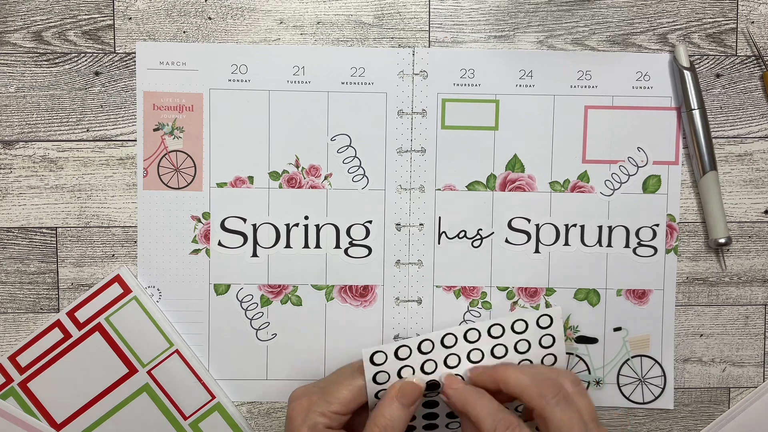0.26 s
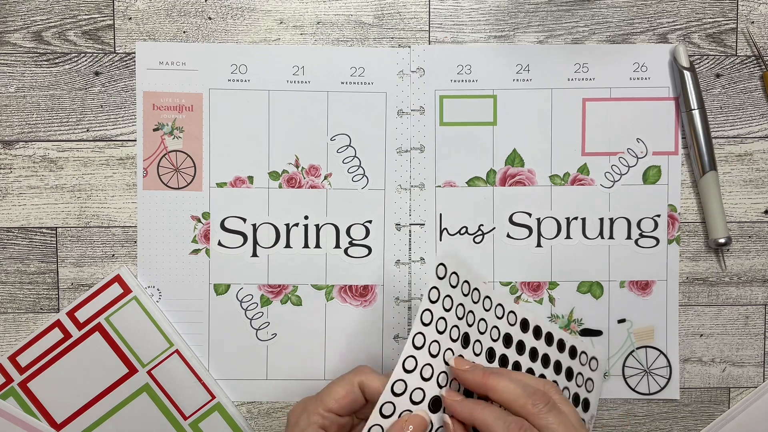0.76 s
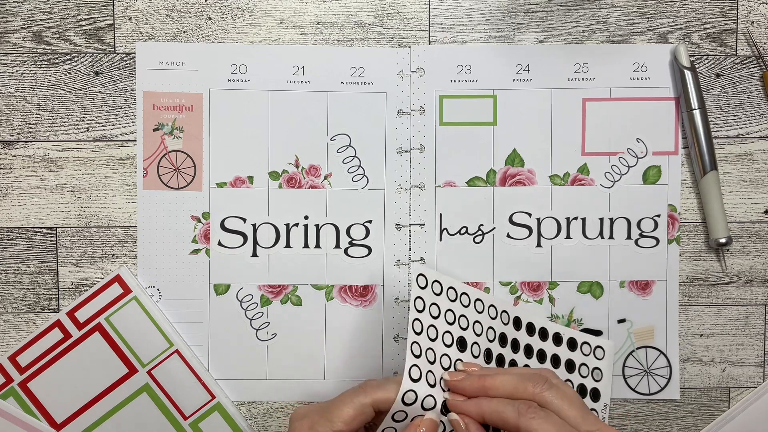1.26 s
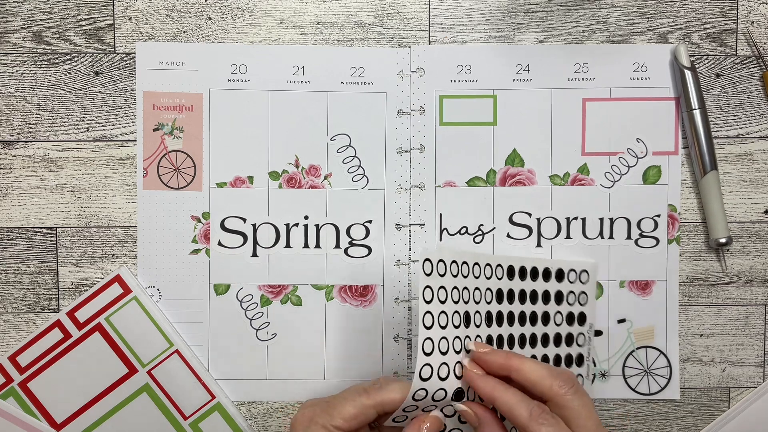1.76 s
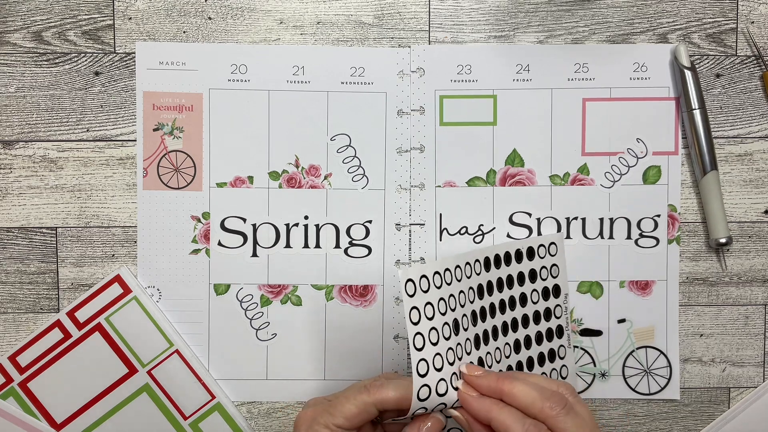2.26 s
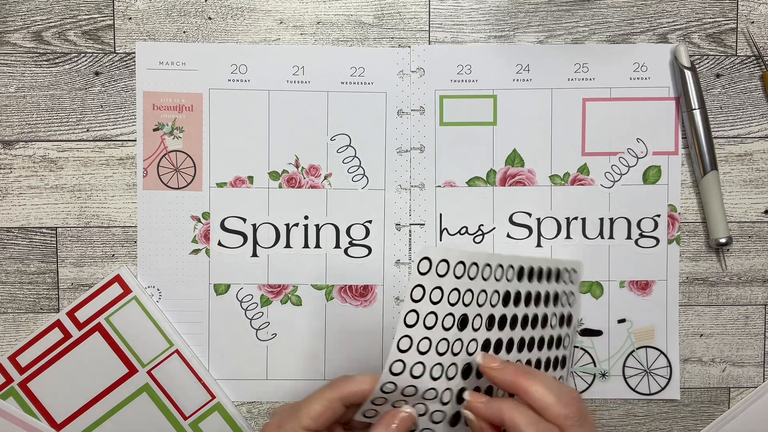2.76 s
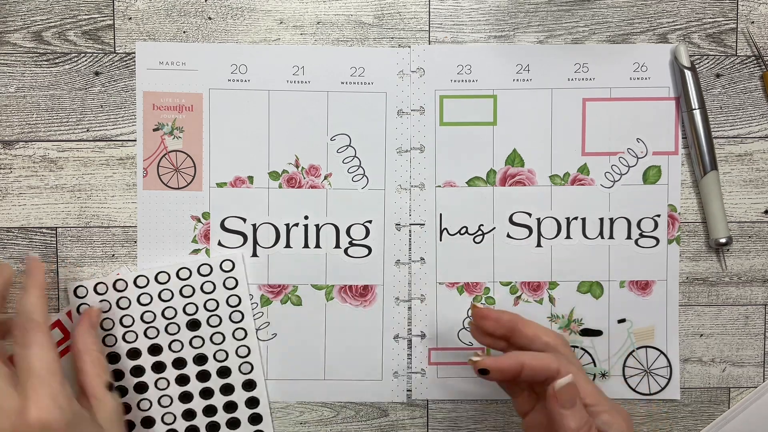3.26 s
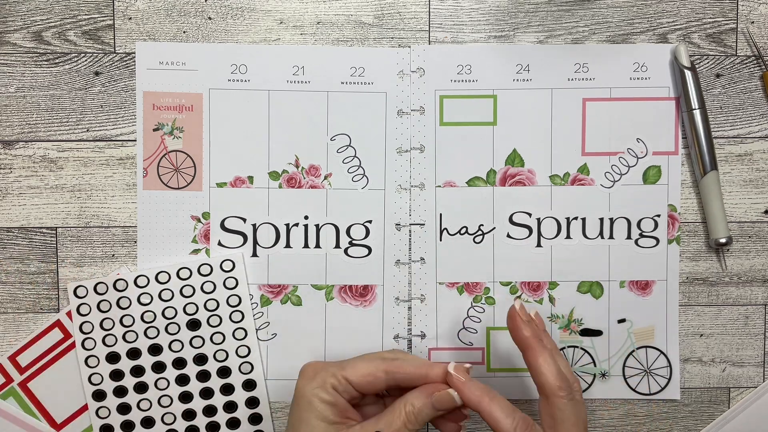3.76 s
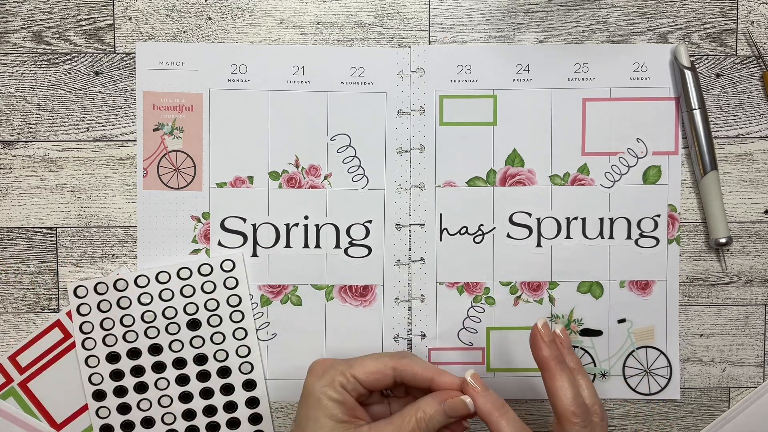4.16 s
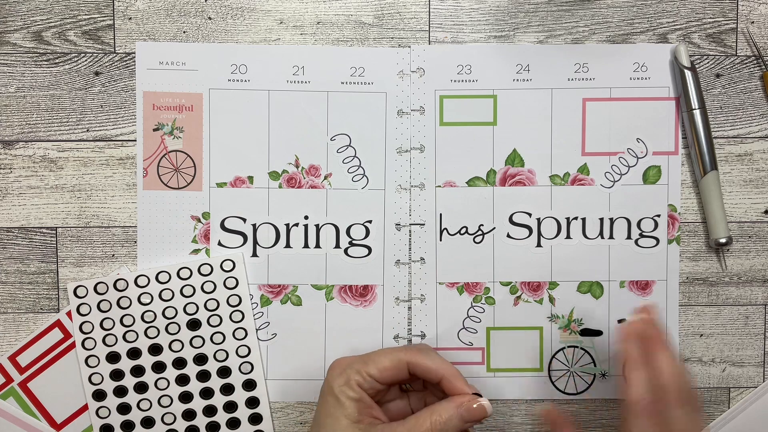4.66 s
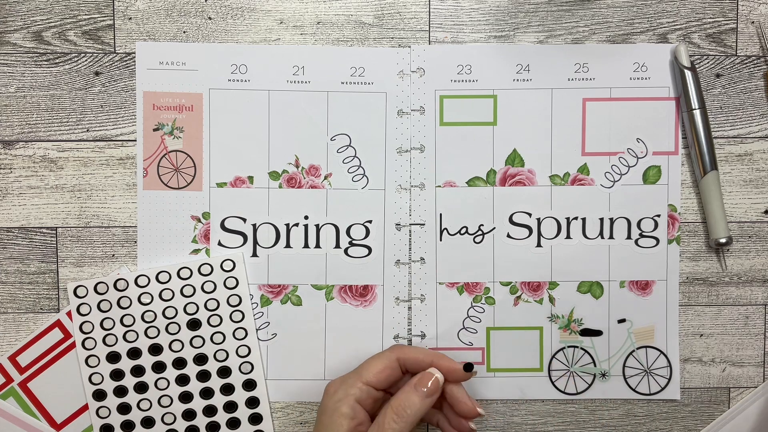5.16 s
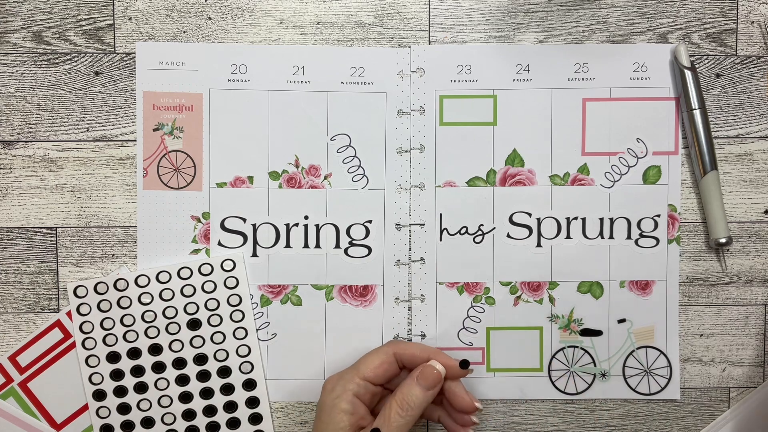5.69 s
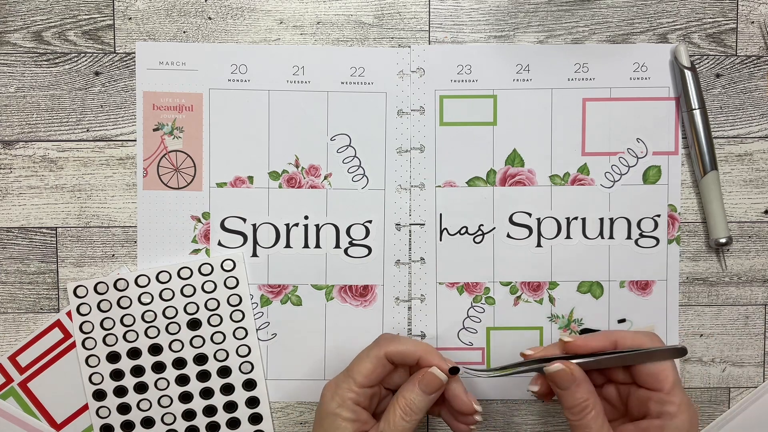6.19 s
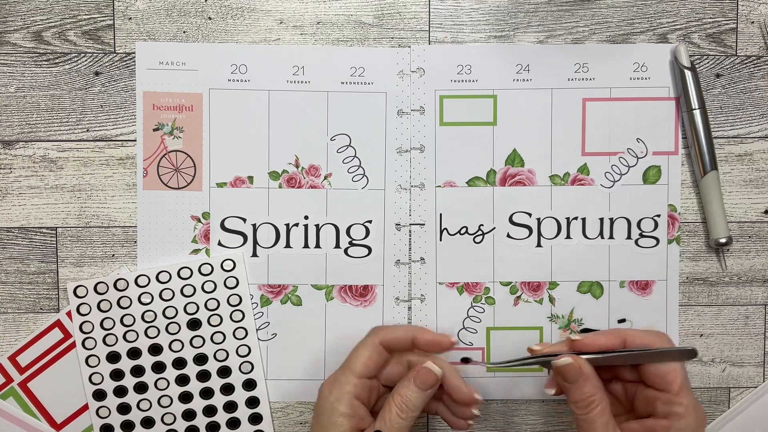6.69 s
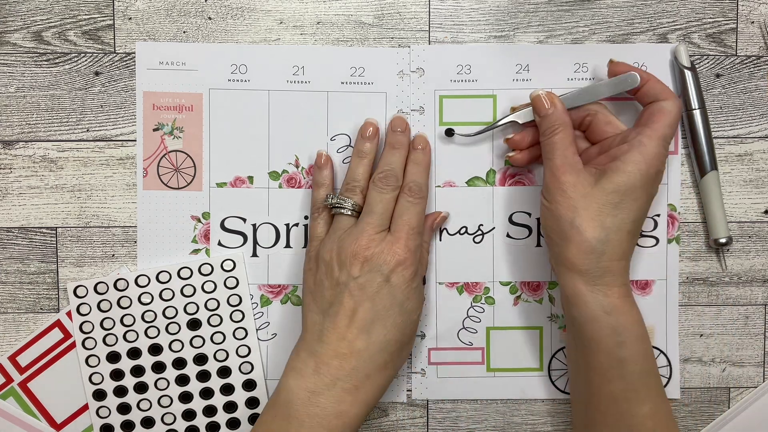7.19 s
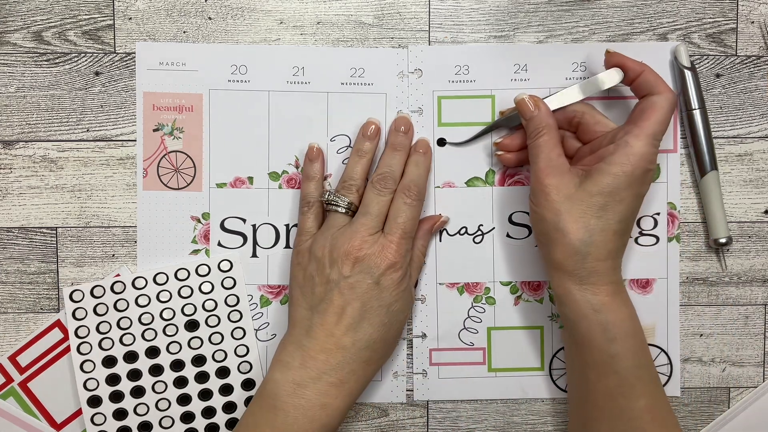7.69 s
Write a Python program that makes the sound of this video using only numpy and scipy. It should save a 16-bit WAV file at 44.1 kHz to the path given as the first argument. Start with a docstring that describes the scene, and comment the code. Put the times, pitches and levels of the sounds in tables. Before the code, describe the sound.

Small stiff sticker sheet rubbed, bent and flicked with papery crackles, then a tiny peel, desk knocks, a brief metallic tweezer scrape and soft page brushes.

```python
"""A small sticker sheet is rubbed, bent and flicked over a paper planner: friction grains excite its resonances,
with crinkles, pops and brief rasps, while low puffs of noise swell and fade.
A dot peels off in a run of jerks; tweezers scrape, stick and slip on the desk, and ring as they touch things.
Low thuds excite damped modes of the desk, and a palm brushes the page as filtered friction noise.
Two close microphone ports hear it by phase and level, with short room reflections and a low noise rumble."""
import sys
import numpy as np
from scipy import signal
from scipy.fft import rfft, irfft, next_fast_len
from scipy.io import wavfile
from scipy.ndimage import map_coordinates

SR = 44100
rng = np.random.default_rng(int(sys.argv[2]) if len(sys.argv) > 2 else 0)


def to_wav(sig):
    """Store sig (one row per channel, or 1-D mono) as 16-bit WAV at the path in sys.argv[1].

    Samples outside -1..1 are clipped; the rate is SR.
    """
    pcm = np.clip(np.atleast_2d(sig), -1, 1) * 32767
    pcm = np.round(pcm).astype(np.int16)
    wavfile.write(sys.argv[1], SR, pcm.T)  # frames by channels


N = 350135
TIME = np.arange(N) / SR


def from_db(db):
    """Logarithmic level: decibels become an amplitude gain."""
    return 10 ** (np.asarray(db) / 20)


def rms_one(x):
    """Mean power: scale a signal to unit rms."""
    return x / np.sqrt(np.mean(x ** 2) + 1e-20)


def per_bin(points, size):
    """Log-frequency interpolation: read a table at every FFT bin."""
    hz, value = np.transpose(points)
    bins_hz = np.fft.rfftfreq(size, 1 / SR)
    return np.interp(np.log(bins_hz + 1), np.log(hz), value)


def colour(x, spectrum):
    """Minimum-phase filtering: a causal response with the given spectrum, falling away beyond its ends."""
    size = 2 * next_fast_len(x.shape[-1] // 2 + 2048)
    low_end = (spectrum[0][0] / 4, spectrum[0][1] - 30)
    high_end = (spectrum[-1][0] * 4, spectrum[-1][1] - 40)
    gain = from_db(per_bin([low_end, *spectrum, high_end], size))
    # folding the cepstrum onto positive time gives the minimum phase
    cepstrum = irfft(np.log(gain))
    cepstrum[1:size // 2] *= 2
    cepstrum[size // 2 + 1:] = 0
    response = np.exp(rfft(cepstrum))
    return irfft(rfft(x, size) * response)[..., :x.shape[-1]]


def resonate(x, hz, width):
    """Simple resonance: one peak whose bandwidth is a share of its centre."""
    hz = min(hz, 0.42 * SR)
    bandwidth_hz = min(hz * width, SR / 4)
    b, a = signal.iirpeak(hz, hz / bandwidth_hz, fs=SR)
    return signal.lfilter(b, a, x)


def drift(rate):
    """Slow random fluctuation: straight lines between normal random values, rate of them a second."""
    knots = rng.standard_normal(N // 20)
    return np.interp(TIME * rate, np.arange(len(knots)), knots)


def add(track, s, sound):
    """Superposition: mix a sound in at time s."""
    start = max(round(s * SR), 0)
    track[start:start + len(sound)] += sound[:N - start]


def grains(per_s, spread_db, patchy_db):
    """Friction as random impulses: surfaces catch and let go in clumps of tiny clicks of uneven size."""
    size_db = spread_db * np.minimum(rng.exponential(1, N), 4)
    sizes = from_db(size_db) * rng.choice([-1, 1], N)
    catches = rng.random(N) < per_s / SR
    return rms_one(sizes * catches * from_db(patchy_db * drift(110)))


def crack(decay_s, edge, rise_s=0.00032):
    """Impulsive release: a sudden edge, then a noise flutter that builds up and dies fast."""
    t = TIME[:SR // 10]
    decay = np.exp(-t / max(decay_s, 1e-4))
    burst = rng.standard_normal(len(t)) * decay * np.minimum(t / rise_s, 1)
    burst[0] += edge
    return burst


def at_level(hit, db):
    """Energy level: scale a hit so that its energy, spread over 4 ms, has this level."""
    return from_db(db) * hit / np.sqrt(np.sum(hit ** 2) / (0.004 * SR))


def click(db, hz, width, decay_s, edge, raw_db, skirt):
    """Impulse-excited resonance: a crack rings one peak and partly passes raw, dulled above the peak."""
    burst = crack(decay_s, edge)
    hit = rms_one(resonate(burst, hz, width)) + from_db(raw_db) * rms_one(burst)
    cutoff_hz = min(hz * (1 + width) * skirt, SR * 4 / 9)
    b, a = signal.butter(2, cutoff_hz, fs=SR)
    return at_level(signal.lfilter(b, a, hit), db)


def strokes(rows, attack_s, slope_db_per_s, release_db_per_s):
    """Power summation of envelopes: one gain curve per level column; strokes rise, slope and die away."""
    power = np.zeros((len(rows[0]) - 2, N))
    for start_s, length_s, *levels_db in rows:
        t = np.maximum(TIME - start_s, 0)
        slope_db = slope_db_per_s * np.minimum(t, length_s)
        release_db = release_db_per_s * np.maximum(t - length_s, 0)
        shape = np.minimum(t / attack_s, 1) * from_db(np.maximum(slope_db - release_db, -120))
        power += np.outer(from_db(levels_db), shape) ** 2
    return np.sqrt(power)


def flex(x, share, rate):
    """Varying stiffness: a wandering time scale moves a body's resonances up and down by about this share."""
    speed = np.exp(share * drift(rate))
    positions = np.cumsum(speed / speed.mean()) - 1
    return map_coordinates(x, [positions], order=3, mode="nearest")


def close_modes(x, t60, share):
    """Modal density: a thin body adds many close, unevenly spaced resonances to what rubs it."""
    t = TIME[:SR // 10]
    ring = rng.standard_normal(len(t)) * from_db(-60 * t / t60)
    return x + share * signal.fftconvolve(x, ring / np.linalg.norm(ring))[:N]


def stick_slip(runs, spectrum, decay_s, edge, uneven_db, count=12):
    """Stick-slip: runs of nearly regular jerks of uneven strength, all ringing the same body."""
    out = np.zeros(N)
    for start_s, length_s, db, period_s in runs:
        gaps_s = period_s * rng.uniform(0.92, 1.08, count)
        for after_s in np.cumsum(gaps_s) - gaps_s[0]:
            jerk_db = db + uneven_db * rng.standard_normal()
            jerk = at_level(colour(crack(decay_s, edge), spectrum), jerk_db)
            if after_s < length_s:
                add(out, start_s + after_s, jerk)
    return out


def crinkles(count=10):
    """Crackling noise: clumps of tiny cracks in the paper; each rings one of several patches of the sheet."""
    low_hz, high_hz = 718, 6500
    cracks = grains(130, 4.9, 1.9)
    patch = rng.integers(0, count, N)
    rings = np.zeros(N)
    for k, hz in enumerate(np.geomspace(low_hz, high_hz, count)):
        rings += resonate(cracks * (patch == k) + 1e-18, hz, 0.43)
    b, a = signal.butter(2, high_hz, fs=SR)
    return rms_one(signal.lfilter(b, a, rings))


# fingers slide on the sheet: start_s, length_s, hiss_db and resonance_db (before the gains in the mix)
FINGER_RUBS = [(-0.03, 0.11, -63.5, -61.5), (0.06, 0.16, -54.5, -53), (0.19, 0.19, -51, -57.5),
               (0.305, 0.069, -49, -47.5), (0.42, 0.17, -59.5, -54.5), (0.535, 0.42, -57.5, -54),
               (1.02, 0.033, -62.5, -53.5), (1.26, 0.046, -57, -56.5), (1.405, 0.073, -53.5, -51.5),
               (1.49, 0.17, -54.5, -48.5), (1.64, 0.27, -55.5, -57), (1.92, 0.053, -51, -48.5),
               (2.09, 0.15, -64.5, -59), (2.25, 0.061, -91, -58.5), (2.425, 0.086, -61.5, -56),
               (2.53, .13, -52, -52), (2.725, 0.2, -53.5, -55), (2.95, 0.085, -62.5, -63.5),
               (3.11, 0.042, -46.5, -52)]
# the sheet is bent and crinkles: start_s, length_s, level_db
SHEET_BENDS = [(0.05, 0.17, -60), (.215, 0.2, -57), (.55, 0.3, -60), (1.45, 0.64, -66), (3.12, 0.08, -51)]
# relative spectrum of friction on paper: frequency_hz, density_db (per Hz)
FRICTION_SPECTRUM = [(1500, -8), (2700, -6.5), (3500, -2.5), (4400, 1.5), (5400, -4), (6300, -1),
                     (7200, -6), (10200, -11), (12300, -31.5), (16000, -27)]
# relative spectrum of the paper's resonances: frequency_hz, density_db (per Hz)
PAPER_SPECTRUM = [(400, -11), (650, -8), (950, 1), (1500, -4.5), (2200, 0), (2800, -9.5), (4000, -11.5)]
RUB_ATTACK_S, RUB_SLOPE_DB_PER_S, RUB_RELEASE_DB_PER_S = 0.024, -7, 202
SHEET_FLEX = 0.07   # share by which resonances wander as the sheet bends
TREBLE_HZ, TREBLE_FOLLOWS, TREBLE_WANDER_DB = 7500, 0.34, 5   # split, exponent of rub level, grip wander


def sticker_sheet():
    """Sliding friction: grains sound as hiss, brighter under pressure, and in shifting sheet resonances."""
    hiss, body = strokes(FINGER_RUBS, RUB_ATTACK_S, RUB_SLOPE_DB_PER_S, RUB_RELEASE_DB_PER_S)
    rubbed = close_modes(grains(5000, 1.4, 1.6), t60=0.0302, share=0.67)
    friction = rms_one(flex(colour(rubbed, FRICTION_SPECTRUM), SHEET_FLEX, rate=14))
    high_pass = signal.butter(2, TREBLE_HZ, "high", fs=SR, output="sos")
    treble = signal.sosfiltfilt(high_pass, friction)
    # a firmer rub reaches higher, and the reach wanders with the grip
    firmness = hiss / np.mean(hiss[hiss > np.median(hiss)]) / 2 + 1e-9
    reach = firmness ** TREBLE_FOLLOWS * from_db(TREBLE_WANDER_DB * drift(20))
    sheet_modes = close_modes(grains(3000, 2.9, 2.14), t60=0.034, share=0.38)
    ringing = rms_one(flex(colour(sheet_modes, PAPER_SPECTRUM), SHEET_FLEX, rate=9))
    bend = strokes(SHEET_BENDS, RUB_ATTACK_S, 0, RUB_RELEASE_DB_PER_S)[0]
    rubbing = from_db(0.63) * hiss * (friction + (reach - 1) * treble)
    return rubbing + from_db(-1.04) * body * ringing + bend * crinkles()


# relative spectrum of the rumble and hiss: frequency_hz, density_db (per Hz)
TONE_SPECTRUM = [(25, -19), (40, -18), (54, -2), (66, -7.5), (85, -13.5), (125, -16.5), (190, -28.5),
                 (330, -37.5), (1000, -44.5), (3000, -53.5), (16000, -57)]
# stereo width of the room tone: frequency_hz, side_minus_mid_db
TONE_SIDE = [(60, -27.5), (130, -12), (300, -3), (700, 2), (5000, -2), (15000, -20.5)]


def room_tone():
    """Mid-side noise: a lumpy rumble common to both sides under a faint wide hiss."""
    mid, side = (rms_one(colour(white, TONE_SPECTRUM)) for white in rng.standard_normal((2, N)))
    return from_db(-55) * (mid + colour(side, TONE_SIDE) * [[1], [-1]])


# paper buckles or is poked, with a pop: start_s, level_db, resonance_hz, width (share of centre)
PAPER_SNAPS = [(0.0503, -42, 1620, 1.3), (0.087, -37.5, 1590, 1.85), (0.1154, -42.5, 1430, 0.52),
               (0.2209, -36.5, 2570, 1.4), (0.2361, -37, 980, 0.91), (0.2547, -32, 4440, 0.76),
               (0.304, -34, 1810, 1.3), (.3225, -42, 1400, 1.1), (.342, -47, 11200, 0.31),
               (0.353, -41.5, 1320, 0.75), (0.382, -38.5, 5000, 0.97), (.394, -43.5, 7500, 0.47),
               (.549, -34, 4440, 0.6), (.597, -43, 544, 0.59), (.640, -50, 1090, 0.64),
               (0.653, -42.5, 1090, 0.36), (0.776, -40.5, 1060, 1.4), (0.850, -37, 870, 2),
               (0.8837, -31.5, 8440, 0.26), (0.954, -46.5, 9500, 0.36), (1.3955, -41.5, 1470, 1.8),
               (1.518, -51, 1800, 0.83), (1.706, -41.5, 3780, 0.83), (1.741, -52, 5460, 0.34),
               (1.785, -48, 1010, 0.8), (1.9366, -54, 2000, 2), (3.0924, -38, 3840, 0.57),
               (3.136, -41.5, 3400, 1), (3.2141, -38.5, 4080, 0.98), (7.5513, -46.5, 1390, 0.34)]
# a nail flicks the taut sheet, which rings: pitch_hz, level_db, width (share of centre), decay_s
FLICK_RINGS = [(3860, -43, 0.22, 0.0011), (2220, -33.5, 0.14, 0.0011), (1224, -33.5, 0.38, 0.0013),
               (883, -31.5, 0.19, 0.0018), (500, -42, 1.5, 0.007)]
FLICK_S, FLICK_TRAVEL_S = 1.1135, 0.008   # travel time of a 1 kHz bending wave
SNAP_BODY_HZ, SNAP_BODY_DB, SNAP_BODY_DB_PER_OCTAVE = 377, -11, -2.5   # bump relative to a 1 kHz pop


def snaps():
    """Buckling and dispersion: pops bump the sheet; in one nail flick high bending waves arrive first."""
    out = np.zeros(N)
    for s, db, hz, width in PAPER_SNAPS:
        add(out, s, click(db, hz, width, decay_s=0.0026, edge=2.7, raw_db=-10, skirt=1.07))
        bump = resonate(resonate(crack(0.006, 0), SNAP_BODY_HZ, 1), SNAP_BODY_HZ, 1)
        # small, high pops move the whole sheet less
        body_db = SNAP_BODY_DB + SNAP_BODY_DB_PER_OCTAVE * np.log2(hz / 1000)
        add(out, s, at_level(bump, db + body_db))
    for hz, db, width, decay_s in FLICK_RINGS:
        arrival_s = FLICK_S + FLICK_TRAVEL_S * np.sqrt(1000 / hz)
        add(out, arrival_s, click(db, hz, width, decay_s, edge=1.0, raw_db=-30, skirt=1))
    return out


# low puffs of noise: start_s, length_s, level_db (before 5 dB of gain)
PUFFS = [(0.12, 0.27, -48), (2.42, 0.091, -56), (2.96, 0.2, -47)]
# relative spectrum of the puffs: frequency_hz, density_db (per Hz)
PUFF_SPECTRUM = [(35, -32.5), (62, 1.5), (90, -4), (122, 3), (280, -15.5), (900, -72)]


def low_puffs():
    """Shaped noise: low puffs swell and fade on both sides alike."""
    noise = rms_one(colour(rng.standard_normal(N), PUFF_SPECTRUM))
    swell = strokes(PUFFS, attack_s=0.1, slope_db_per_s=0, release_db_per_s=73)[0]
    return from_db(5.0) * noise * swell


# the bending sheet, its edges or the tweezers rasp briefly:
# start_s, length_s, level_db, resonance_hz, width (share of centre)
SHORT_RASPS = [(0.212, 0.22, -54.5, 370, 0.47), (0.22, 0.018, -49, 6000, 0.57),
               (0.536, 0.27, -54.5, 616, 0.87), (0.545, 0.024, -51.5, 5070, 0.46),
               (0.717, 0.073, -50, 4200, 0.26), (0.86, 0.055, -55.5, 9400, 0.41),
               (1.529, 0.051, -39.5, 1460, 0.2), (1.552, 0.042, -49, 5450, 0.89),
               (2.409, 0.098, -57.5, 2150, 0.047), (2.594, 0.16, -59, 426, 0.61),
               (3.136, 0.033, -45.5, 6450, 0.99), (3.168, 0.0089, -39, 5340, 0.78),
               (4.893, 0.1, -57, 1300, 0.2), (4.911, 0.015, -48, 13800, 0.25),
               (5.122, 0.093, -62, 2150, 0.23)]


def rasps():
    """Frictional chatter: dense clicks sound for a moment in one resonance that shifts meanwhile."""
    out = np.zeros(N)
    chatter = grains(2500, 2.7, 2.56)
    for s, length_s, db, hz, width in SHORT_RASPS:
        row = (s, length_s, db)
        stroke = strokes([row], attack_s=0.018, slope_db_per_s=-12, release_db_per_s=519)[0]
        out += stroke * rms_one(flex(resonate(chatter, hz, width), share=0.05, rate=40))
    return out


# low thuds of hands, tool and sheet, ringing the desk: start_s, level_db (gain of the thud), cutoff_hz
LOW_THUDS = [(0.848, -53.5, 787), (1.124, -44, 1110), (3.029, -38.5, 119), (4.865, -38.5, 600),
             (4.878, -36.5, 130), (4.893, -45, 1100), (4.929, -39, 1015), (4.958, -44, 900),
             (5.064, -47, 714), (5.246, -53, 394), (5.39, -41, 447), (5.408, -28, 102),
             (5.523, -46.5, 1100), (7.554, -46.5, 157)]
# modes of the desk top: pitch_hz, level_db (before random variation), t60_s
DESK_MODES = [(114.1, -1, 0.25), (138.8, -6, 0.3), (217, -20, 0.068), (280.6, -6, 0.17), (363.5, -11, 0.2),
              (424, -10, 0.14), (681, -6.5, 0.072)]
# relative spectrum of a dull thud, also used under the scrape: frequency_hz, density_db (per Hz)
THUD_SPECTRUM = [(90, 2.5), (350, 2.5), (750, -9), (1500, -8)]


def desk():
    """Modal synthesis: low thuds ring damped desk modes, each with a strength of its own."""
    out, t = np.zeros(N), TIME[:SR // 2]
    hz, mode_db, t60 = np.transpose(DESK_MODES)[:, :, None]
    for s, db, cutoff_hz in LOW_THUDS:
        varied_db = mode_db + 0.49 * rng.standard_normal(hz.shape)
        strength = from_db(varied_db) * rng.choice([-1, 1], hz.shape)
        modes = strength * from_db(-60 * t / t60) * np.sin(2 * np.pi * hz * t)
        thud = np.sum(modes, axis=0)
        add(thud, 0, from_db(10.0) * colour(crack(0.029, 0), THUD_SPECTRUM))
        b, a = signal.butter(2, cutoff_hz, fs=SR)   # a softer thud passes only the lows
        add(out, s, from_db(db) * signal.lfilter(b, a, thud))
    return out


# the glue lets go in a run of jerks: start_s, length_s, level_db (mean), period_s
PEEL_RUNS = [(2.5063, 0.052, -41, 0.006)]
# relative spectrum of a jerk of the glue: frequency_hz, density_db (per Hz)
GLUE_SPECTRUM = [(1000, -32), (2200, -5), (3500, -14.5), (5000, 0), (6100, 1.5), (7700, 3.5), (9300, -10.5),
                 (15500, -13)]


def peel():
    """Stick-slip adhesion: the glue under the dot lets go in quick, uneven jerks."""
    return stick_slip(PEEL_RUNS, GLUE_SPECTRUM, decay_s=0.0043, edge=7.3, uneven_db=2.5)


# tweezers touch things: start_s, tap_db, ring_db, ring_tilt_db_per_octave
TWEEZER_TICKS = [(4.5746, -53, -47, 41), (4.862, -47.5, -45.5, -1), (4.8927, -43, -49, -1),
                 (5.061, -42.5, -52, -2), (5.387, -43.5, -50, -7), (5.475, -61.5, -67, -4),
                 (6.6556, -55, -40.5, 0.5), (7.202, -47.5, -63, -3), (7.551, -47, -58, -14)]
# modes of the tweezers: pitch_hz, level_db (relative, before the tilt), width (share of centre), decay_s
STEEL_MODES = [(1270, 2, 0.17, 0.0033), (4730, -21, 0.19, 0.0014), (9800, 3, 0.05, 0.0029),
               (14200, -8.5, 0.17, 0.0023)]


def ticks():
    """Contact hardness: each touch is a short tap and a ring of the steel, brighter for a harder contact."""
    out = np.zeros(N)
    for s, tap_db, ring_db, tilt_db in TWEEZER_TICKS:
        tap = click(tap_db, hz=4700, width=0.68, decay_s=0.0035, edge=3.7, raw_db=-19.0, skirt=0.67)
        add(out, s, tap)
        ring = 0
        for hz, db, width, decay_s in STEEL_MODES:
            mode_db = db + tilt_db * np.log2(hz)
            ring = ring + click(mode_db, hz, width, decay_s, edge=0.92, raw_db=-3.0, skirt=1.0)
        add(out, s, at_level(ring, ring_db))
    return out


# tweezers are pulled over the desk, louder as they gather speed:
# start_s, length_s, level_db (at the start, before the gains of the scrape's parts)
TWEEZER_PULLS = [(4.89, 0.032, -55.5), (4.92, 0.016, -44.5), (4.995, 0.0081, -53.5), (5.03, 0.039, -55.5),
                 (5.078, 0.1, -49)]
# relative spectrum of the scrape: frequency_hz, density_db (per Hz)
SCRAPE_SPECTRUM = [(1500, -21), (2800, -6.5), (3600, -2.5), (4100, 3), (4450, 1), (5050, 1), (5900, -4),
                   (7200, -7), (10000, -13.5), (12000, -30)]
# the dragged tweezers stick and slip in runs: start_s, length_s, level_db (mean), period_s
SLIP_RUNS = [(5.1685, .012, -38.5, 0.0054), (5.187, .004, -44, .006), (5.1935, .024, -35, .0075),
             (5.2423, .021, -32, 0.0084)]
# relative spectrum of a slip: frequency_hz, density_db (per Hz)
SLIP_SPECTRUM = [(700, -37.5), (2800, -9.5), (3600, -7.5), (4100, 2.5), (5200, 4), (7300, -13), (8700, -7),
                 (16000, -31)]
# the tip springs free and glints, one row: start_s, level_db, pitch_hz
TIP_RELEASE = (5.261, -48, 12250)


def tweezers():
    """Friction-driven vibration: steel scrapes, sets the desk humming, sticks and slips, and glints free."""
    pull = strokes(TWEEZER_PULLS, attack_s=0.0091, slope_db_per_s=75, release_db_per_s=293)[0]
    grit = grains(1600, 1.3, 2.2)
    steel_modes = close_modes(grit, t60=0.035, share=1)
    steel = flex(colour(steel_modes, SCRAPE_SPECTRUM), share=0.012, rate=25)   # the tip tilts
    thud = colour(grit, THUD_SPECTRUM)
    hum = rms_one(resonate(grit, hz=271, width=0.064))
    scrape = pull * (from_db(6.5) * steel + from_db(-6.0) * thud + from_db(-18.5) * hum)
    slips = stick_slip(SLIP_RUNS, SLIP_SPECTRUM, decay_s=0.0032, edge=1.3, uneven_db=0.1)
    s, db, hz = TIP_RELEASE
    glint = click(db, hz, width=0.0017, decay_s=0.0084, edge=0.67, raw_db=-14, skirt=1.4)
    add(slips, s, glint)
    return scrape + slips + ticks()


# the palm brushes the page in short strokes:
# start_s, length_s, hiss_db (before 1.5 dB of gain), resonance_db, hiss_centre_hz
PALM_STROKES = [(6.712, 0.11, -68.5, -74, 6500), (6.851, 0.16, -71.5, -70.5, 4700),
                (7.178, 0.015, -53.5, -60, 3900), (7.25, 0.19, -69.5, -73.5, 4700),
                (7.47, 0.028, -67, -73, 5300)]


def palm():
    """Sliding friction: skin brushes the page, each stroke with its own brightness and wavering pressure."""
    out = np.zeros(N)
    friction = colour(grains(9000, 1.5, 1.7), FRICTION_SPECTRUM)
    page = rms_one(colour(grains(6000, 3.1, 0.79), PAPER_SPECTRUM))
    for *stroke, hz in PALM_STROKES:
        hiss, body = strokes([stroke], attack_s=0.06, slope_db_per_s=1.5, release_db_per_s=160)
        brushed = rms_one(resonate(friction, hz, width=1.0))
        out += from_db(1.5) * hiss * brushed + body * page
    return out * from_db(2 * drift(rate=22))


# phase between the two microphone ports: frequency_hz, phase_rad
PORT_PHASE = [(340, 0), (860, 1.4), (1210, 1.1), (1890, -.8), (2900, -3.3), (4200, -6.1), (7300, -5.6),
              (10000, -6.7)]


def ports(x, right_db):
    """Interchannel phase: near sounds reach two ports with a phase gap that turns with frequency."""
    size = 2 * next_fast_len(N // 2 + 1000)
    turn = np.exp(1j * per_bin(PORT_PHASE, size) * np.array([[1], [0]]))
    return irfft(rfft(x, size) * turn)[:, :N] * from_db([[-right_db / 2], [right_db / 2]])


# relative spectrum of the reflections: frequency_hz, gain_db
REFLECTION_SPECTRUM = [(100, -6), (500, 6.5), (1500, 4), (4500, -1), (16000, -3)]


def room(x, t60, wet_db, first_s):
    """Diffuse reverberation: dense, dull reflections as decaying noise, different on each side."""
    t = TIME[:SR // 2]
    decay = from_db(-60 * t / t60) * np.minimum(t / first_s, 1)
    tail = rng.standard_normal((2, len(t))) * decay
    tail = colour(tail / np.sqrt(np.sum(tail ** 2) / 2), REFLECTION_SPECTRUM)
    return from_db(wet_db) * signal.fftconvolve(x[None], tail, axes=1)[:, :N]


def scene():
    """Superposition of near sources: paper, tweezers, desk and palm reach the ports directly and by the room."""
    near = sticker_sheet() + snaps() + rasps() + desk() + peel() + tweezers() + palm()
    direct = ports(near, right_db=2.0)
    reflected = room(near, t60=0.25, wet_db=-8.5, first_s=0.00097)
    return direct + reflected + low_puffs() + room_tone()


def record(dry):
    """Band limiting: a steep elliptic low-pass cuts the top at 16.3 kHz."""
    low_pass = signal.ellip(10, 0.2, 70, 16300, fs=SR, output="sos")
    return signal.sosfilt(low_pass, dry)


dry = scene()
out = record(dry)
to_wav(out)
```